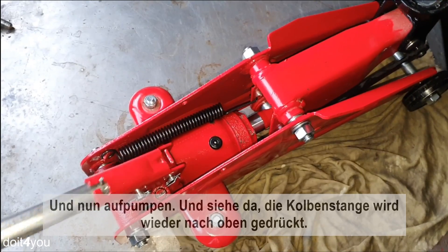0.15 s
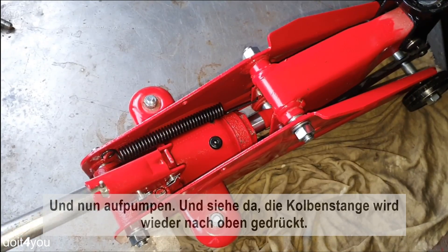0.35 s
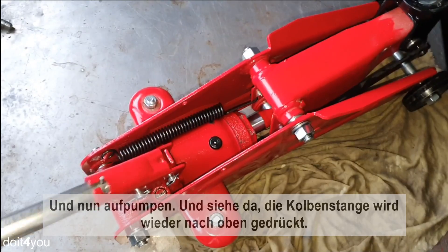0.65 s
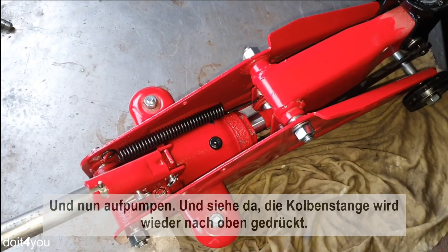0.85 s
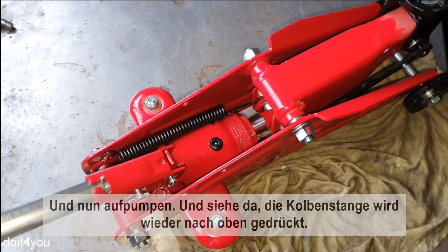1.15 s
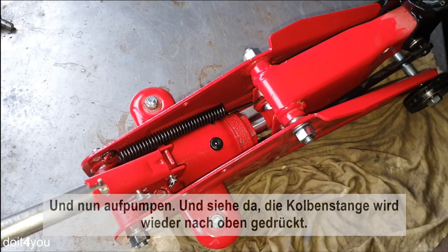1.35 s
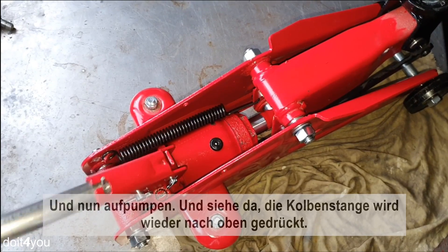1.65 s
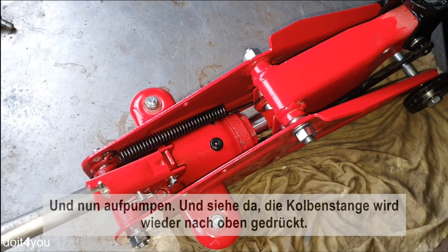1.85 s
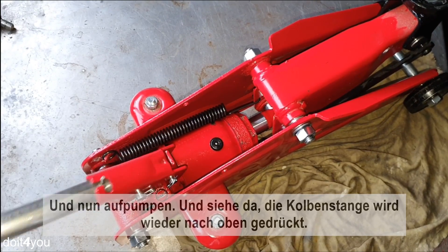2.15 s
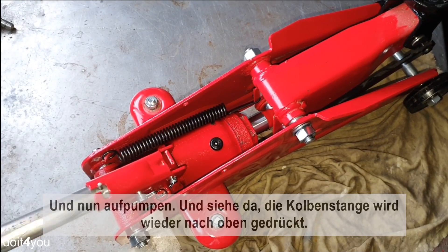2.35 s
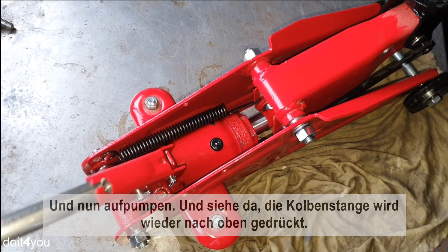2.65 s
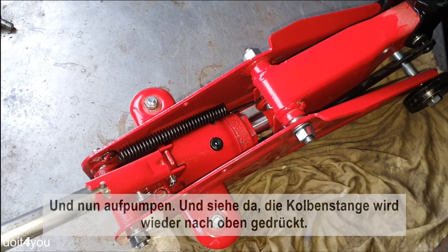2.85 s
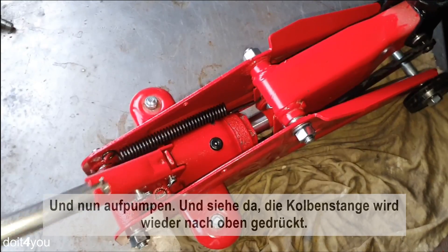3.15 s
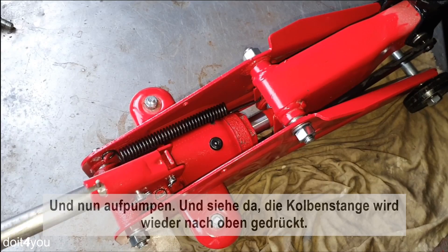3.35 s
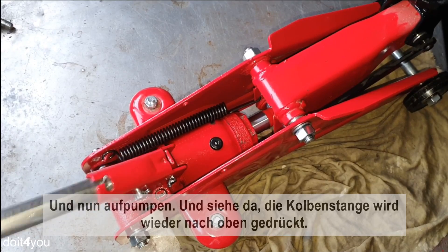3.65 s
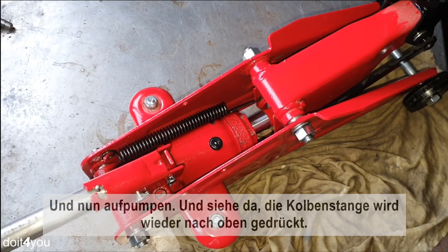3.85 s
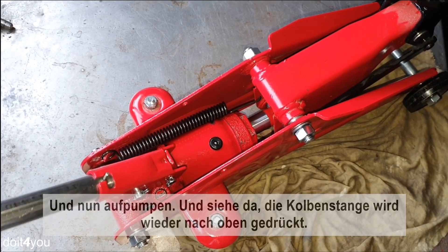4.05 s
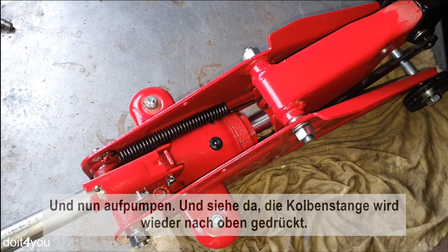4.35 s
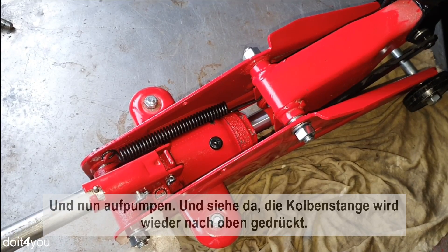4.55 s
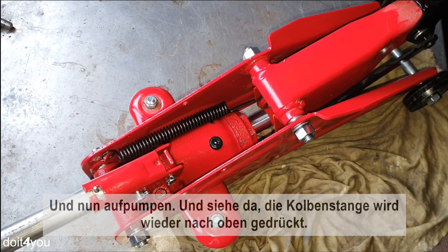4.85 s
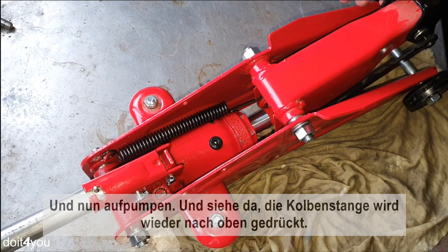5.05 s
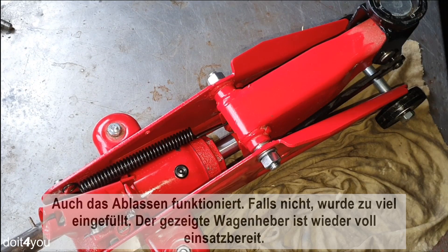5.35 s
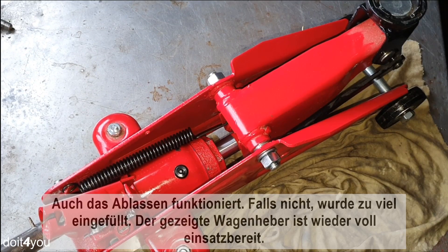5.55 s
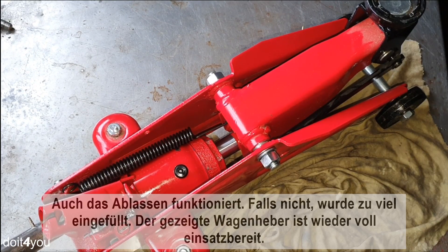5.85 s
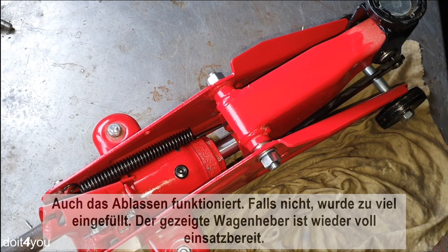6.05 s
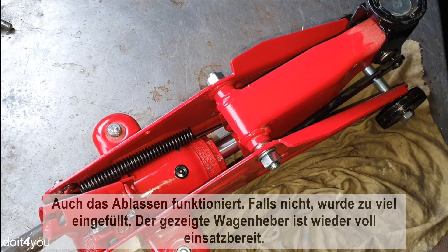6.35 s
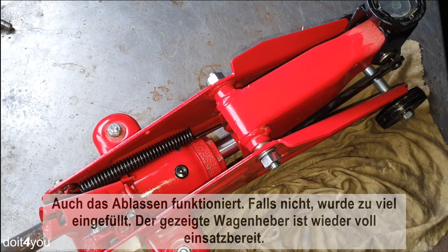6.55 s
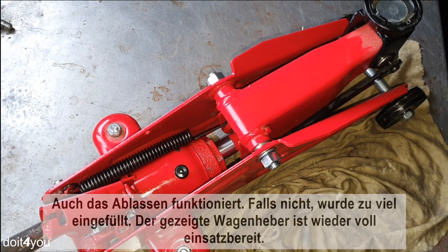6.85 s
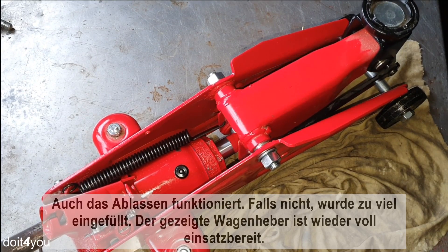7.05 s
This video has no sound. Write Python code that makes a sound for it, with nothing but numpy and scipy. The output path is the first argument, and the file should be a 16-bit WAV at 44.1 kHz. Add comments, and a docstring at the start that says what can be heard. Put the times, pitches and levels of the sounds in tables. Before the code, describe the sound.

Hard, dry metal-on-metal clatter runs in a quick, irregular pumping rhythm: bright cracks, chattering loose joints, brief rings, and woody low thumps from the bench. The strongest clanks come around the middle and near the end of the pumping. Then it stops abruptly, leaving faint handling, a dull click, a few tiny knocks and soft hiss in a small, briefly echoing workshop, heard closely in stereo.

```python
"""A steel floor jack on a workbench is pumped fast by its handle, then left to settle.
Its pins and links clack: each blow is a noise crack, a chatter of loose parts and ringing steel.
The bench booms in dying sines, the joints rub as uneven noise, and the valve whistles faintly.
Soft treble puffs, room tone and a small workshop's echo complete it; two close microphones."""
import sys
import numpy as np
from scipy import signal
from scipy.fft import rfft, irfft, next_fast_len
from scipy.io import wavfile
from scipy.ndimage import uniform_filter1d

SR = 44100
rng = np.random.default_rng(int(sys.argv[2]) if len(sys.argv) > 2 else 0)


def master(y):
    """Save y as 16-bit WAV."""
    cut = np.clip(np.atleast_2d(y).T, -1, 1)
    pcm = np.round(cut * 32767)  # scale
    wavfile.write(sys.argv[1], SR, pcm.astype(np.int16))


def how_loud(loudness_db):
    """Turn decibels into a plain amplitude multiplier (0 dB gives 1, 20 dB gives 10)."""
    steps = np.asarray(loudness_db, float) / 20
    return 10 ** steps


N = 316623  # samples, about 7.2 s

# Metal hits metal: (time [s], level [dB], weight passed to the bench [dB], centre [Hz])
METAL_BLOWS = [(0.127, -13, -16, 2130), (0.249, -20.5, -9, 1980), (0.252, -13.5, -13, 5340),
               (0.342, -32, -16.5, 2640), (0.361, -16.5, -26.5, 3370), (0.381, -16, -12.5, 2296),
               (0.495, -23, -6, 860), (0.528, -17.5, -9.5, 831), (0.607, -20.5, -13, 1870),
               (0.624, -20, -12, 1347), (0.749, -18.5, -4.5, 1850), (0.756, -9, -14, 5283),
               (0.841, -16.5, -39.5, 3140), (0.865, -23.5, -11.5, 1750), (0.893, -10, -21.5, 3860),
               (0.986, -23, -9, 907), (1.027, -26, -2, 843), (1.116, -16.5, -11, 1670),
               (1.135, -20.5, -10, 1134), (1.345, -25, -12, 3166), (1.388, -17, -28.5, 1260),
               (1.401, -17, -17.5, 2503), (1.459, -29, -8, 1283), (1.517, -24, -6.5, 920),
               (1.555, -34, -30, 4940), (1.62, -20.5, -25, 5440), (1.637, -18, -11.5, 1194),
               (1.859, -26.5, -24, 2890), (1.881, -19.5, -17, 2127), (1.906, -13.5, -19.5, 2728),
               (2.058, -25.5, -45, 6540), (2.143, -12, -26.5, 4960), (2.144, -12.5, -13.5, 1533),
               (2.329, -21.5, -25, 1339), (2.363, -14.5, -27, 3250), (2.38, -18, -19.5, 6760),
               (2.452, -23, -15, 1983), (2.468, -24, -5.5, 1706), (2.552, -23.5, -20.5, 5100),
               (2.641, -6, -22.5, 5606), (2.646, -6, -18, 4870), (2.824, -23, -17.5, 3183),
               (2.872, -18, -25.5, 1907), (2.883, -15, -19.5, 4065), (2.953, -30.5, -2, 930),
               (3.02, -17.5, -8.5, 796), (3.08, -29, -6.5, 1375), (3.106, -17, -8, 1661),
               (3.278, -49.5, -35.5, 6450), (3.38, -16, -25, 3270), (3.407, -19.5, -19.5, 3170),
               (3.413, -16.5, -17, 1883), (3.517, -16.5, -17, 1620), (3.558, -10.5, -16.5, 959),
               (3.61, -18, -3, 809), (3.652, -8.5, -21.5, 1886), (3.918, -19.5, -35.5, 2180),
               (3.935, -14.5, -17.5, 2447), (4.04, -33, -3.5, 990), (4.118, -21.5, -32.5, 4900),
               (4.19, -18.5, -16, 1100), (4.196, -5, -24.5, 3730), (4.54, -26.5, -5, 1806),
               (5.345, -35, -27, 886), (5.792, -65, 11.5, 895), (5.876, -21, -32, 3350),
               (6.055, -54.5, -17, 3440), (6.191, -60.5, 7.5, 1330), (6.251, -61, 6, 1373),
               (6.47, -71.5, 4, 900), (7.146, -65, 6, 853)]
# The jack rocks on the bench: (time [s], level [dB])
ROCKING_THUDS = [(0.089, -28.5), (3.027, -19), (5.233, -51), (5.359, -46), (5.903, -36.5), (6.07, -38.5)]
# Hands on the resting jack: (time [s], rubbing [dB], shaking of the bench [dB])
RESTING_HANDS = [(4.302, -78, -49.5), (4.619, -64.5, -67), (4.9, -84.5, -72.5), (5.078, -75, -62.5),
                 (5.191, -62, -62), (5.212, -70.5, -60), (5.449, -78.5, -75), (6.169, -90.5, -59.5),
                 (6.201, -79, -56), (6.321, -79, -58.5), (6.501, -76.5, -68.5), (6.75, -94.5, -78.5),
                 (7.18, -93.5, -80)]
# Ringing of frame, arm and handle: (frequency [Hz], relative level [dB])
STEEL_MODES = [(886, -10), (1210, 0.5), (1345, -3.5), (1660, -12), (1775, -0.5), (2070, 1.5), (2550, -3.5),
               (2760, -5), (2840, -7.5), (3130, 0), (3340, -3.5), (3870, -1), (4300, -0.5), (4900, 3.5),
               (5340, 4.5), (5720, -6.5), (6720, -0.5), (9475, -5.5), (10460, 3), (14840, -18)]
# Upper bench modes: (frequency [Hz], relative level [dB], time to fall 60 dB [s])
BOARD_MODES = [(162.3, 2.5, 0.09), (215, 6, 0.062), (317, 8, 0.042), (547.7, -0.5, 0.039)]
# Basic tone of a metal blow: (frequency [Hz], relative level [dB per Hz])
CRACK_COLOUR = [(470, -27.5), (800, -9.5), (1320, -2.5), (2350, -3), (3140, 3), (4080, -2), (5380, -6),
                (7450, -13.5), (14500, -8.5), (16000, -36)]
# Tone of the rubbing joints: (frequency [Hz], relative level [dB per Hz])
JOINT_COLOUR = [(200, -12.5), (500, -1), (2000, -9.5), (6000, -11.5), (8000, -16.5), (16000, -17.5)]
# Tone of room and microphone hiss: (frequency [Hz], relative level [dB per Hz])
QUIET_COLOUR = [(15, -39), (25, -15), (99, -5), (212, -19.5), (394, -15), (560, -24.5), (2990, -27.5),
                (6500, -30.5), (8000, -38.5), (11000, -25.5), (16000, -29)]
# How long the workshop echoes: (frequency [Hz], time to fall 60 dB [s])
SHOP_DECAY = [(100, 0.77), (300, 0.3), (800, 0.18), (2000, 0.24), (5000, 0.22), (13000, 0.17)]
# Oil squeezes past the valve: (start [s], end [s], start pitch [Hz], end pitch [Hz], level [dB])
VALVE_WHISTLES = [(3.21, 3.33, 10500, 11600, -80), (3.716, 3.82, 12200, 10500, -79),
                  (4.278, 4.38, 10630, 11900, -79), (4.45, 4.557, 11400, 11000, -79)]
# Pump strokes: (start [s], load on the bench [dB], rubbing [dB], shaking of the bench [dB])
PUMP_STROKES = [(-0.158, -44.5, -52, -27), (0.322, -19.5, -53, -46.5), (0.824, -24, -59.5, -52),
                (1.322, -27.5, -50, -56), (1.825, -27, -50.5, -33.5), (2.31, -25.5, -45.5, -39.5),
                (2.807, -19.5, -49, -31.5), (3.336, -23, -43, -37.5), (3.853, -40, -65.5, -44)]
# Soft puffs of treble hiss: (centre [s], width [s], level [dB])
HISS_PUFFS = [(5.03, 0.056, -74.5), (5.29, 0.057, -68), (6.1, .04, -80.5), (6.33, 0.045, -80.5),
              (6.48, .05, -85)]

QUIET_DB = -76.5  # rms
RIGHT_LAG = 6  # samples
LOAD_S = .177  # from the start of a stroke to the moment the piston takes the load
# Soft touches: (level [dB], weight passed to the bench [dB], centre [Hz])
TAKE_UP = (-36, -7, 1500)  # first touch of a stroke, as the play closes
TOUCH = (-32, -8, 1500)  # two stray touches in each stroke
TOUCH_SPAN_S = .24  # stray touches fall within this time from the stroke's start
BRIGHT_DB = -23.5  # starting point for the treble of a blow
SLACK_DB, SLACK_S, SLACK_WIDTH_S = 7.5, .045, 0.015  # the slack pin jingles early in a stroke
REST_S, REST_DB = 4.3, -16  # blows turn duller once the pumping stops
HEAVY_DULLS = 0.55  # dB of treble lost per dB of weight
THROUGH_DB = -2  # share of a blow's weight that booms in the bench
HISS_HZ = 11000
RUB_RISE, RUB_FALL = 94, 72.4  # dB per s, before and after the load
SHAKE_RISE, SHAKE_FALL = 70, 100  # dB per s


def evened(x):
    """Scales to rms 1."""
    return x / np.sqrt(np.mean(x ** 2) + 1e-20)


def read(points, hz):
    """Reads a curve on a log-frequency axis."""
    f, value = np.transpose(points)
    return np.interp(np.log(hz + 1), np.log(f + 1), value)


def add(mix, s, sound):
    """Mixes a two-channel sound in at s seconds."""
    part = mix[:, round(s * SR):][:, :sound.shape[1]]
    part += sound[:, :part.shape[1]]


def coloured(x, db_of_hz):
    """Filters without sounding early: the phase follows from the log gain."""
    size = next_fast_len(x.shape[-1] + 2048)
    hz = abs(np.fft.fftfreq(size, 1 / SR))
    log_gain = np.log(how_loud(np.maximum(db_of_hz(hz), -100)))
    response = np.exp(np.conj(signal.hilbert(log_gain)))[:size // 2 + 1]
    return irfft(rfft(x, size) * response, size)[..., :x.shape[-1]]


def ring(modes, t, scatter_db):
    """Dying sines; where the blow lands sets how strongly each mode speaks."""
    hz, db, t60 = np.transpose(modes)[:, :, None]
    chance = rng.standard_normal((len(modes), 2))
    level = how_loud(db + scatter_db * chance[:, :1] - 60 * t / t60)
    return (level * np.sin(2 * np.pi * hz * t + 3 * chance[:, 1:])).sum(0)


def panned(x, db):
    """Makes left louder than right by db."""
    return x * how_loud(np.array([[db / 2], [-db / 2]]))


def quiet():
    """Room tone and microphone hiss: noise that is alike in both channels in the bass only."""
    noise = rng.standard_normal((3, N))
    low = coloured(noise[0], lambda f: read(QUIET_COLOUR, f) - 10 * np.log10(1 + (f / 500) ** 2))
    high = coloured(noise[1:], lambda f: read(QUIET_COLOUR, f) - 10 * np.log10(1 + (500 / (f + 1)) ** 2))
    return how_loud(QUIET_DB) * evened(low + high)


def effort(column, rise, fall):
    """A dB curve that climbs to each stroke's load and sinks after it; at rest it follows the hands."""
    t = np.arange(N) / SR
    hands = np.transpose(RESTING_HANDS)
    humps = []
    for row in PUMP_STROKES:
        after_load = t - row[0] - LOAD_S
        humps.append(row[column] - np.maximum(-rise * after_load, fall * after_load))
    at_rest = np.interp(t, hands[0], hands[column - 1], left=-np.inf)
    return np.maximum(np.max(humps, 0), at_rest)


def rubbing():
    """Uneven slips hiss in the joints, shake small ticks out of the steel and keep the bench trembling."""
    level_db = effort(column=2, rise=RUB_RISE, fall=RUB_FALL)
    shake_db = effort(column=3, rise=SHAKE_RISE, fall=SHAKE_FALL)
    unevenness_db = 2 * evened(uniform_filter1d(rng.standard_normal(N), 200))
    slips = rng.standard_normal((2, N)) * how_loud(unevenness_db)
    t = np.arange(15000) / SR

    # Eight loose parts, each ticking about 14 times a second
    ticks = (rng.random((8, N)) < 14 / SR) * rng.exponential(1, (8, N)) ** 1.4
    short_modes = [(f, db, .02) for f, db in STEEL_MODES]
    parts = np.array([ring(short_modes, t[:3000], scatter_db=6) for _ in ticks])
    ringing = signal.oaconvolve(ticks, parts, axes=1)[:, :N].sum(0)
    rattle = panned(evened(ringing), 1.9)
    loose = how_loud(np.minimum(level_db + 58, 0))  # the rattle is full only in brisk motion
    scrape = evened(coloured(evened(slips) + loose * rattle, lambda f: read(JOINT_COLOUR, f)))

    push = rng.standard_normal(N) + 0.3 * rng.standard_normal((2, N))
    low_modes = ring([(52, -3, .3), (96, 0, .3)], t, scatter_db=0)
    bench = low_modes + how_loud(-10) * ring(BOARD_MODES, t, scatter_db=0)
    tremble = evened(signal.oaconvolve(push, bench[None], axes=1)[:, :N])
    return how_loud(level_db) * scrape + how_loud(shake_db) * tremble


def thud(db):
    """The bench top swells into its lowest modes and dies."""
    t = np.arange(25000) / SR
    modes = ring([(97.2, -2.0, 0.22), (78, -7.5, 0.18), (53.2, -8.5, 0.17)], t, scatter_db=-1.5)
    return how_loud(db + 11) * panned(modes * (1 - np.exp(-t / 0.015)) ** 2, 0)


def workshop(x):
    """Sparse reflections of random sign, each band dying at its own speed; three sets take turns."""
    out = np.zeros((2, N))
    turn = np.arange(N) / SR * 2.317 * np.pi
    for k in range(3):
        # One reflection at a random place in every 20 samples
        taps = np.zeros((2, SR // 2))
        slots = np.arange(200, SR // 2 - 20, 20)
        at = slots + rng.integers(0, 20, (2, (SR // 2 - 201) // 20))
        np.put_along_axis(taps, at, rng.choice([-1., 1.], at.shape), 1)
        hz, t, z = signal.stft(taps, SR, nperseg=256)
        # Long waves reach both microphones more alike
        z += .55 * (z.mean(0) - z) / (1 + (hz[:, None] / 350) ** 2)
        decay = how_loud(-60 * t / read(SHOP_DECAY, hz)[:, None])
        tail = signal.istft(z * decay, SR, nperseg=256)[1]
        tail = tail / np.linalg.norm(tail[0])
        share = np.sqrt(2 / 3) * np.cos(turn + k * np.pi / 3)
        out += signal.oaconvolve((x * share)[None], tail, axes=1)[:, :N]
    return out


def brightness(s, dull_db):
    """Treble setting of a blow in dB, from its place in the stroke and its weight."""
    slack = sum(np.exp(-((s - row[0] - SLACK_S) / SLACK_WIDTH_S) ** 2) for row in PUMP_STROKES)
    return BRIGHT_DB + SLACK_DB * slack + REST_DB * (s > REST_S) - HEAVY_DULLS * (dull_db + 15.5)


def blow(db, dull_db, bright_db, hz, width=0.61, peak_db=8):
    """A crack, a short chatter of loose parts and the steel's ring; the bench answers below."""
    t = np.arange(12000) / SR
    noise = rng.standard_normal((3, len(t)))
    ticks = (rng.random(len(t)) < 300 / SR) * rng.uniform(0, 2, len(t))
    grain = .7 + np.convolve(ticks, np.exp(-t[:200] / .0015))[:len(t)]
    crack = (noise[0] + 1.5 * (t == 0)) * how_loud(-60 * t / .007)
    chatter = how_loud(-19 - 60 * t / .14) * grain * (noise[:2] + .7 * noise[0])

    def nearness(f):  # the part that was hit rings most, with its octave
        return sum(np.exp(-((np.log2(f / hz) - octave) / 0.05) ** 2) for octave in range(2))

    struck = [(f, level + 14 * nearness(f), .07 * (3000 / f) ** .5) for f, level in STEEL_MODES]
    ring_db = -33 - .5 * (np.clip(db, -36, -10) + 20)  # soft touches ring more against their crack
    steel = crack + chatter + how_loud(ring_db) * ring(struck, t, scatter_db=3)

    # Every contact point has its own humps
    lumps = np.c_[np.geomspace(700, 16000, 16), 2.5 * rng.standard_normal(16)]
    treble_hz = np.clip(2.8 * hz, 3500, 7500)

    def steel_colour(f):
        near_hz = peak_db * np.exp(-(np.log2((f + 1) / hz) / width) ** 2)
        treble = (bright_db + 20.5) / (1 + (treble_hz / (f + 1)) ** 6)
        return read(CRACK_COLOUR, f) + read(lumps, f) + near_hz + treble

    steel = coloured(steel, steel_colour)
    knock = coloured(noise[2] * how_loud(-60 * t / 0.14), lambda f: -7 * np.log2((f + 1) / 480) ** 2)
    board = (ring(BOARD_MODES, t, scatter_db=3.5) + 8 * knock) * (1 - np.exp(-t / 0.0014))
    left_db = 5.5 + 2 * rng.standard_normal()
    steel = panned(steel / abs(steel).max(), left_db)
    board = panned(board / abs(board).max(), 2.8)
    return how_loud(db) * (steel + how_loud(dull_db + 2.5) * board)


def valve():
    """Oil squeezes past the valve in thin whistles: faint gliding sines that waver."""
    out = np.zeros((2, N))
    for start, end, hz0, hz1, db in VALVE_WHISTLES:
        size = round((end - start) * SR)
        waver = 60 * evened(uniform_filter1d(rng.standard_normal(size), 300))  # Hz
        hz = np.linspace(hz0, hz1, size) + waver
        tone = np.sin(2 * np.pi * np.cumsum(hz) / SR) * signal.windows.tukey(size, .5)
        add(out, start, how_loud(db) * panned(tone, 3))
    return out


def hiss():
    """Treble noise that swells and fades in soft puffs."""
    noise = coloured(rng.standard_normal((2, N)), lambda f: -7 * np.log2((f + 1) / HISS_HZ) ** 2)
    t = np.arange(N) / SR
    puffs = sum(how_loud(db) * np.exp(-((t - s) / width) ** 2) for s, width, db in HISS_PUFFS)
    return evened(noise) * puffs


def scene():
    """Jack and bench, their echo in the shop, rubbing, valve, hiss and room tone."""
    jack, bench = np.zeros((2, 2, N))
    starts = np.transpose(PUMP_STROKES)[0]
    stray = (starts[:, None] + TOUCH_SPAN_S * rng.random((len(starts), 2))).ravel()
    soft = [(s, *TAKE_UP) for s in starts] + [(s, *TOUCH) for s in stray]
    for s, db, dull_db, hz in METAL_BLOWS + [row for row in soft if row[0] > 0]:
        add(jack, s, blow(db, dull_db, brightness(s, dull_db), hz))
        add(bench, s, thud(db + dull_db + THROUGH_DB))
    loads = [(row[0] + LOAD_S, row[1]) for row in PUMP_STROKES]
    for s, db in ROCKING_THUDS + loads:
        add(bench, s, thud(db))
    # The right microphone is farther and shaded
    jack[1] = coloured(np.roll(jack[1], RIGHT_LAG), lambda f: -4 / (1 + (7000 / (f + 1)) ** 4))
    echo = how_loud(-3.5) * workshop(jack.mean(0)) + how_loud(-11) * workshop(bench[0])
    return jack + bench + echo + rubbing() + valve() + hiss() + quiet()


def low_pass(x):
    """Removes everything above the highest recorded frequency."""
    return signal.sosfilt(signal.butter(12, 16470, fs=SR, output="sos"), x)


def record(dry):
    """The microphones lose the top treble."""
    heard = coloured(dry, lambda f: -10 / (1 + (12000 / (f + 1)) ** 8))
    return low_pass(heard)


dry = scene()
out = record(dry)
master(out)
```